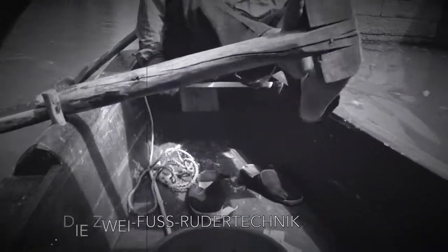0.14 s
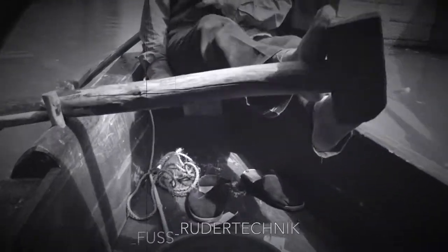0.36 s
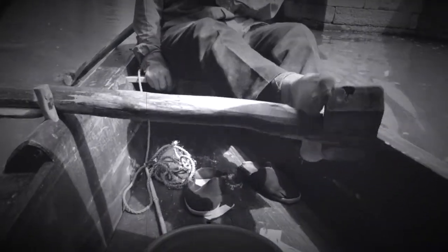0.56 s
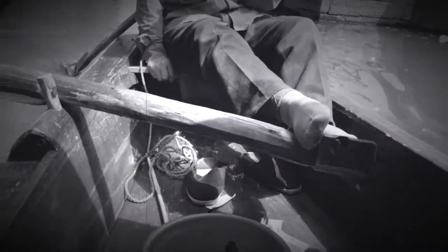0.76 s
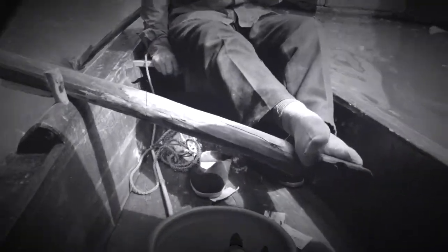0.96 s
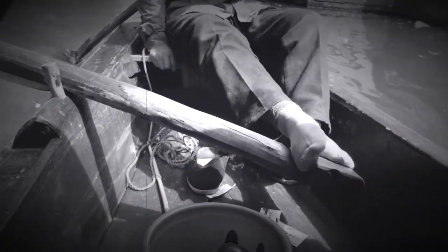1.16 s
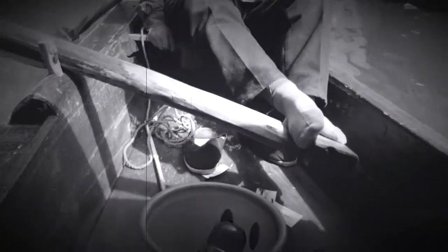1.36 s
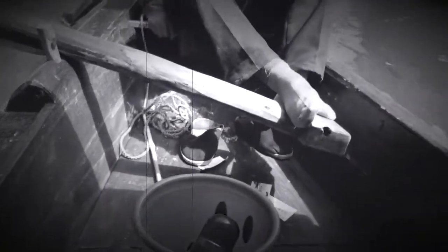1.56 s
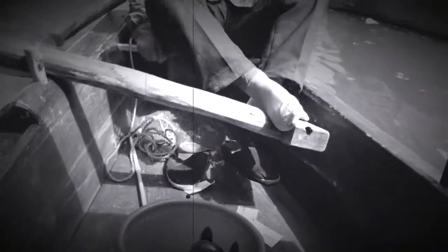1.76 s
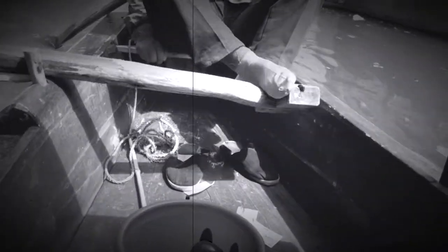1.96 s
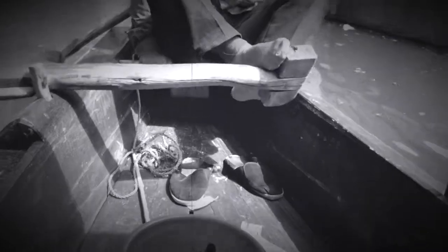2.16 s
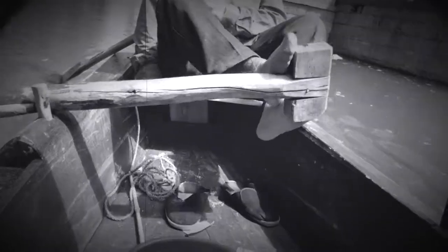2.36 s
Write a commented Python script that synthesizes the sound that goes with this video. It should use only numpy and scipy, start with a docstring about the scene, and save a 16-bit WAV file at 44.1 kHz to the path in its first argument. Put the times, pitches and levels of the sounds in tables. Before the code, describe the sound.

A wooden oar pivot squeals loudly, falling in pitch, then judders; later a dull wooden knock

```python
"""On a canal, a wooden oar worked by foot turns on its pivot in a small boat.
The pivot squeals by fast stick-slip on a falling pitch, then slow separate slips judder and ring the hull.
Later the oar knocks home: struck wood is a sum of dying tones with a puff of noise for the crack.
Clicks, ticks and scuffs sound over filtered noise for water, small rising chirps for bubbles, and a far hum.
The squeal overloads the recorder, which limits and softly clips it."""
import sys
import numpy as np
from scipy import signal
from scipy.fft import rfft, irfft
from scipy.io import wavfile
from scipy.ndimage import uniform_filter1d

SR = 44100
rng = np.random.default_rng(int(sys.argv[2]) if len(sys.argv) > 2 else 0)


def bounce(signal):
    """Save signal as a 16-bit WAV file at the path given by the first command-line argument."""
    frames = np.transpose(np.atleast_2d(signal))
    limited = np.clip(frames, -1, 1)
    pcm = np.round(limited * 32767).astype(np.int16)
    wavfile.write(sys.argv[1], SR, pcm)


N = 105840
T = np.arange(N) / SR  # time in seconds
SIDES = np.array([[1], [-1]])  # opposite signs for left and right
EDGE_HZ = 15750  # top of the recorded band

# How alike left and right are. Each row: frequency in Hz, likeness (1 = identical).
SAME = [(60, .98), (600, 0.95), (1400, 0.91), (3100, 0.61), (6800, 0.035), (15000, 0.024)]
# Tones of the oar and hull. Each row: frequency in Hz, relative level in dB, seconds to fall 60 dB.
HULL = [(128.5, -8.5, 0.19), (258.2, -0.5, 0.15), (296, -1.5, 0.25), (370.2, 9.5, .11), (439, 7, 0.096),
        (492.6, 0, 0.12), (555, 6.5, .09), (630.6, 11, 0.12), (708, -4.5, 0.1), (725, 3, 0.048),
        (833, 3.5, 0.12), (910, -4.5, 0.14), (1061.6, 6, 0.076), (1125, -7, .1)]
# How the water changes. Each row: time in seconds, then rumble, wash and hiss relative levels in dB.
WATER = [(0, -34.5, -35, -41), (.14, -37, -35.5, -56), (.45, -38, -38.5, -51), (.66, -44, -42.5, -50.5),
         (.82, -43, -43, -50.5), (1.05, -40, -42.5, -51.5), (1.2, -40, -41.5, -56), (1.4, -41.5, -42, -52),
         (1.56, -39.5, -46.5, -58), (1.74, -42, -44, -55), (1.92, -42.5, -43, -62), (2.1, -38, -44, -57.5),
         (2.27, -37, -44.5, -49), (2.4, -40, -39, -53)]


def amp(db):
    """Turns decibels into a gain."""
    return 10 ** (np.asarray(db) / 20)


def unit(x):
    """Scales a signal to an rms of 1."""
    return x / np.sqrt(np.mean(x ** 2) + 1e-20)


def read(points, hz):
    """Reads a table of frequencies and values, with pitch-like (log) spacing between points."""
    f, value = np.transpose(points)
    return np.interp(np.log(hz + 1), np.log(f + 1), value)


def curves(table):
    """Draws each column of a timed table as a curve, sample by sample."""
    s, *columns = np.transpose(table)
    return [np.interp(T, s, c) for c in columns]


def waver(hz):
    """Random motion with rms 1, mostly slower than the given rate."""
    smooth = 1 + (np.fft.rfftfreq(N, 1 / SR) / hz) ** 4
    return unit(irfft(rfft(rng.standard_normal(N)) / smooth, N))


def colour(x, spectrum):
    """Filters a sound by a table of frequencies and dB."""
    size = x.shape[-1]
    return irfft(rfft(x) * amp(read(spectrum, np.fft.rfftfreq(size, 1 / SR))), size)


def noise(spectrum, size=N):
    """Stereo noise: the two sides share most of their bass and little of their treble."""
    a, b = rfft(rng.standard_normal((2, size)))
    same = np.clip(read(SAME, np.fft.rfftfreq(size, 1 / SR)), -1, 1)
    right = same * a + np.sqrt(1 - same ** 2) * b
    return unit(colour(irfft(np.array([a, right]), size), spectrum))


def burst(spectrum, t60):
    """A dying puff of noise with a soft start, scaled to energy 1 on the left."""
    x = noise(spectrum, size=8192)
    t = T[:x.shape[1]]
    rise_s = 0.021 * t60
    x = x * amp(-60 * t / t60) * (1 - np.exp(-(t / rise_s) ** 2))
    return x / np.linalg.norm(x[0])


def ring(modes, rise_s):
    """Struck wood or hull: a sum of tones that each die at their own rate."""
    tones = sum(amp(db - 60 * T / t60) * np.sin(2 * np.pi * hz * T) for hz, db, t60 in modes)
    return (1 - np.exp(-T / rise_s)) * tones


def blows(rows):
    """Single-sample hits from rows of seconds and dB."""
    x = np.zeros(N)
    for s, db in rows:
        x[round(s * SR)] += amp(db)
    return x


def excite(force, response):
    """Lets a force set off a response, by convolution."""
    return signal.fftconvolve(np.atleast_2d(force), np.atleast_2d(response), axes=1)[:, :N]


def strokes(rows, ramp_s):
    """Level of each rub as it rises, holds and falls; rows give start, length in seconds and dB."""
    return sum(amp(db) * np.clip(np.minimum(T - s, s + length - T) / ramp_s, 0, 1)
               for s, length, db in rows)


def boat(x):
    """Dense short reflections inside the open hull, dying at a rate set by frequency."""
    # Each row: frequency in Hz, seconds to fall 60 dB.
    boat_t60 = [(100, 0.4), (500, 0.28), (1200, 0.21), (2500, 0.1), (5000, 0.16), (15000, 0.12)]
    hz, t, z = signal.stft(noise([(20, 0), (20000, 0)], size=16384), SR, nperseg=256)
    fade = amp(-60 * t / read(boat_t60, hz)[:, None])
    tail = signal.istft(z * fade, SR, nperseg=256)[1]
    return excite(x, tail / np.linalg.norm(tail[0]))


def water():
    """Low rumble, lapping wash and fine hiss from filtered noise, with a faint far hum."""
    # Colours of the three layers. Each row: frequency in Hz, relative level in dB.
    rumble_colour = [(20, -15), (45, -5.5), (70, 0), (105, 3.5), (145, 0.5), (175, -4.5), (225, -2.5),
                     (265, 4), (300, -17), (500, -43)]
    wash_colour = [(150, 0.5), (300, 4.5), (370, 5.5), (430, 5), (540, 4), (630, 1), (730, 5), (790, -3),
                   (870, 4.5), (1100, -2), (1400, -0.5), (1900, -13.5), (2600, -17), (5000, -81)]
    hiss_colour = [(900, -27), (1800, 14), (2600, 4), (3500, 1.5), (4500, -2.5), (7000, -9.5), (10000, -19),
                   (15500, -64)]
    rumble_db, wash_db, hiss_db = curves(WATER)
    rumble = amp(rumble_db) * noise(rumble_colour)
    wash = amp(wash_db + 2.16 * waver(hz=35)) * noise(wash_colour)
    hiss = amp(hiss_db + 2.1 * waver(hz=40) + 2.0 * waver(hz=500)) * noise(hiss_colour)
    hum_hz = 502.5 + 1.62 * waver(hz=6.3)
    hum_level = np.sqrt(2) * amp(-49.5 + 0.83 * waver(hz=2.4))
    hum = hum_level * np.sin(2 * np.pi * np.cumsum(hum_hz) / SR)
    return rumble + wash + hiss + hum


def laps():
    """Tiny bubbles and drips along the hull: short rising chirps, louder when the water hisses."""
    laps_per_s, lap_db, spread_db, lap_cycles = 150, -5, 2.5, 6.9
    low_hz, high_hz, pitches = 645.3, 3556, 24
    hiss_db = curves(WATER)[2]
    out, t = np.zeros((2, N)), T[:2048]
    for hz in np.geomspace(low_hz, high_hz, pitches):
        chance, size, pan = rng.random(N), rng.exponential(1, N), rng.uniform(-0.58, 1)
        level = amp(hiss_db + lap_db + spread_db * np.minimum(size, 3))
        drops = (chance < laps_per_s / pitches / SR) * level
        u = t * hz / lap_cycles
        swell = np.e * u * np.exp(-u)
        chirp = np.sin(2 * np.pi * hz * t * (1 + 2 * t))
        bubble = swell * chirp * (hz / high_hz) ** -.7  # deeper bubbles are louder
        out += excite(drops, bubble) * amp(2 * pan * SIDES)
    return out


def squeal():
    """Fast stick-slip: a strong fundamental, overtones shaped by the wood, and a rasp at each slip."""
    # Each row: time in seconds, slips per second, relative level in dB,
    # relative level of overtones and rasp in dB, roughness from 0 to 1.
    squeal_path = [(.134, 677, -28.5, -14, 0.72), (.142, 634.8, -13.5, 8.5, 0.71),
                   (.151, 556.5, -6.5, 2, 0.47), (.162, 527.5, -3, -2.5, 0.47),
                   (.18, 495.5, -4.5, -2, 0.05), (.204, 472.6, -6, -1.5, 0.13),
                   (.219, 443.3, -5.5, -4, 0.02), (.245, 437.1, 0, -2.5, 0.04), (.275, 429, -2, -3, 0),
                   (.291, 421.3, 3.5, -2.5, 0.1), (.299, 407, -7.5, 7.5, .6)]
    # The squeal stumbles. Each row: time in seconds, dip of the fundamental in dB.
    catches = [(0.172, 8.5), (.212, 2.5)]
    # Overtone levels set by the wood. Each row: frequency in Hz, relative level in dB.
    pivot = [(500, -7), (900, -12), (1100, -6.5), (1350, -19), (1750, -17), (2200, -15), (2600, -25.5),
             (3000, -22), (3500, -30.5), (3900, -30), (4600, -38.5), (6500, -42), (9000, -55),
             (15000, -60.5)]
    # Colour of the rasp. Each row: frequency in Hz, relative level in dB.
    rasp_colour = [(100, -37), (300, -9), (600, 0), (1050, 0.5), (1400, -18), (2250, -16.5), (3000, -26),
                   (5000, -46), (9000, -45.5), (15000, -58)]
    catch_s, catch_sag, catch_rough = 0.00272, 0.117, 0.24  # sag is a share of the pitch
    jitter, release_s = 0.091, 0.0028  # jitter is a share of the pitch at full roughness
    # A resonance of the pivot flares as the squeal starts.
    shriek_hz, shriek_width_hz = 2285, 240
    shriek_db, shriek_end_s, shriek_fade_s = 10.5, 0.165, 0.0038
    wander_db, treble_rough = 2.5, 0.035  # roughness in radians per overtone number

    hz, db, over_db, rough = curves(squeal_path)
    bumps = [np.exp(-((T - s) / catch_s) ** 2) for s, _ in catches]
    dip_db = sum(b * dip for b, (_, dip) in zip(bumps, catches))
    rough = np.clip(rough + catch_rough * sum(bumps), 0, 1)
    hz = hz * (1 - catch_sag * sum(bumps)) * (1 + jitter * rough * waver(hz=220))
    turns = np.cumsum(hz) / SR  # slips so far

    start = np.clip((T - squeal_path[0][0]) / release_s, 0, 1)
    end = np.exp(-np.maximum(T - squeal_path[-1][0], 0) / release_s)
    level = amp(db) * start * end
    flare_db = shriek_db * .5 * (1 - np.tanh((T - shriek_end_s) / shriek_fade_s))
    wander, shake = waver(hz=36), waver(hz=300)

    on, over = level > 1e-4, np.zeros((2, N))
    for k in np.arange(2, 36):
        f, shift = k * hz[on], rng.integers(N)  # each overtone wanders on its own
        likeness = np.clip(read(SAME, f.mean()), -1, 1)
        spread = np.arccos(likeness) / 2 * rng.choice([-1, 1]) * SIDES
        near_shriek = np.exp(-((f - shriek_hz) / shriek_width_hz) ** 2)
        k_db = read(pivot, f) + wander_db * np.roll(wander, shift)[on] + flare_db[on] * near_shriek
        angle = 2 * np.pi * (k * turns[on] + rng.random())
        angle = angle + treble_rough * k * np.roll(shake, shift)[on]
        over[:, on] += amp(k_db) * (f < EDGE_HZ) * np.sin(angle + spread)

    slip_pulse = unit(0.95 + np.exp(-(turns % 1) / 1.1))
    rasp = amp(-8) * rough * noise(rasp_colour) * slip_pulse
    upper = level * amp(over_db) * (np.sqrt(2) * over + rasp)
    base = np.sqrt(2) * level * amp(-dip_db) * np.sin(2 * np.pi * turns)
    return base + upper + amp(-6.5) * boat(upper + amp(-12) * base)


def judder():
    """The oar slows: separate slips strike the wood and ring the hull."""
    # Each row: time in seconds, slips per second, relative level in dB, relative crackle level in dB.
    judder_path = [(.292, 125.3, 8, -1), (.302, 126, 0, -2), (.312, 125, 3, 7.5), (.322, 122.7, 6, 5.5),
                   (.331, 125, -27, -16.5), (.339, 122, -2, -30)]
    # Colours of the grit and crackle. Each row: frequency in Hz, relative level in dB.
    grit_colour = [(100, -16), (170, -14.5), (300, -3.5), (700, 5), (1000, -3.5), (1400, -7), (1850, -10),
                   (2300, -7.5), (3000, -36), (5000, -57)]
    crackle_colour = [(500, -26), (2000, 8.5), (3000, -1), (4000, -5.5), (5500, -13.5), (8000, -20),
                      (15000, -29)]
    hz, db, crackle_db = curves(judder_path)
    on = (T >= judder_path[0][0]) & (T <= judder_path[-1][0])
    turns = np.cumsum(on * hz * (1 + .09 * waver(hz=91.3))) / SR
    # One hit each time the count of slips passes a whole number.
    slips = np.diff(np.ceil(turns), prepend=0) * amp(db + 2 * waver(hz=151))
    wood = amp(-13) * excite(slips, ring(HULL, rise_s=0.0028))
    grit = amp(23.5) * excite(slips, burst(grit_colour, t60=0.085))
    crackle = amp(4.5) * excite(slips * amp(crackle_db), burst(crackle_colour, t60=.045))
    return wood + grit + crackle + amp(-14) * boat(wood + crackle)


def clicks():
    """Small ticks of shifting wood, and dry snaps to the left made of short tones and a noise puff."""
    # Small ticks. Each row: time in seconds, relative level in dB.
    tick_times = [(.422, -29.5), (.572, -25.5), (.761, -26), (.9783, -15), (.9815, -28), (.989, -27),
                  (1.434, -27), (1.607, -34.5), (2.112, -28), (2.25, -24.5), (2.31, -32)]
    # Colour of a tick. Each row: frequency in Hz, relative level in dB.
    tick_colour = [(300, 15), (1200, -4), (3500, 10.5), (6000, -0.5), (9000, -12.5), (15000, -12)]
    # Dry wooden snaps. Each row: time in seconds, relative level in dB, treble tilt in dB per kHz.
    snap_times = [(1.1826, -20, 1.5), (1.295, -27, -1.14)]
    # Tones of a snap. Each row: frequency in Hz, relative level in dB, seconds to fall 60 dB.
    snap_tones = [(1150, -9, 0.022), (1650, -0.5, 0.014), (1860, 1, 0.0072), (2760, 2, 0.016),
                  (3610, -8, 0.013), (5630, -12.5, 0.013), (7300, -2, 0.0063)]
    # Colour of the body of a snap. Each row: frequency in Hz, relative level in dB.
    snap_colour = [(600, -1), (1200, -10), (1700, 6), (2800, 7), (3900, -15), (4600, -8), (6000, -14),
                   (7500, -21), (9000, -14), (14000, -37)]
    pan_db, lead_s = 3, .00006  # the snap is louder on the left and gets there first

    ticks = excite(blows(tick_times), amp(4.5) * burst(tick_colour, t60=0.032))
    snap = np.zeros(N)
    for s, db, tilt in snap_times:
        tilted = [(f, d + tilt * f / 1000, t60) for f, d, t60 in snap_tones]
        snap += excite(blows([(s, db)]), ring(tilted, rise_s=0.00023))[0]
    delay = np.exp(-2j * np.pi * np.fft.rfftfreq(N, 1 / SR) * lead_s)
    late = irfft(rfft(snap) * delay, N)
    snap = np.array([snap, late]) * amp(pan_db * SIDES)
    snap_hits = blows([(s, db) for s, db, _ in snap_times])
    crack = excite(snap_hits, amp(9.5) * burst(snap_colour, t60=0.01))
    return snap + crack + ticks


def scuffs():
    """Grainy scuffs and slides of noise along the oar, and short dry rubs of the pivot."""
    # Thin, grainy swishes of wood sliding on wood, foot and cloth rubbing on wood, and rubs of the pivot.
    # Each row: start in seconds, length in seconds, relative level in dB.
    swish_times = [(0.581, 0.11, -52), (2.154, 0.076, -44.5)]
    scuff_times = [(0.617, 0.11, -48), (1.03, .1, -50.5), (1.428, 0.079, -44), (2.118, .11, -41.5),
                   (2.243, 0.15, -52.5)]
    rub_times = [(2.247, 0.033, -38), (2.38, .05, -33)]
    # Their colours. Each row: frequency in Hz, relative level in dB.
    swish_colour = [(1500, -13), (2700, 3), (3250, 8), (3750, 8), (4300, -24), (7500, -33), (11000, -30),
                    (14000, -17)]
    scuff_colour = [(300, -11), (1000, 12), (2300, 2), (3500, -0.5), (4700, -5), (7500, -11), (10500, -20),
                    (13500, -20), (16000, -20)]
    rub_colour = [(500, -12), (850, -3), (1000, -3), (1150, -8), (1400, 8), (1800, 7), (2200, -7),
                  (5000, -36)]
    scuffing = strokes(scuff_times, ramp_s=0.015) * noise(scuff_colour)
    swishing = strokes(swish_times, ramp_s=0.017) * noise(swish_colour)
    grain = amp(1.3 * waver(hz=250))
    rubbing = strokes(rub_times, ramp_s=0.011) * noise(rub_colour)
    return (scuffing + swishing) * grain + rubbing


def knocks():
    """Boards shift, the oar hits its pin and chatters, and the hull booms as it takes the load."""
    # The boat's boards shift. Each row: time in seconds, relative level in dB.
    bump_times = [(.981, -37.5), (.988, -39), (2.25, -46.5)]
    # The hull takes the load. Each row: time in seconds, relative level in dB.
    boom_times = [(.983, -31.5), (1.997, -18), (2.0235, -15.5)]
    # The oar hits its pin. Each row: time in seconds, relative ring level in dB, relative crack level in dB.
    knock_times = [(1.9913, -28, -12), (1.9975, -15.5, -25)]
    # Tones of the hull boom and the oar.
    # Each row: frequency in Hz, relative level in dB, seconds to fall 60 dB.
    boom_tones = [(46.4, -18.5, 0.86), (81, -6, 0.25), (96.3, 1, .2), (112, -2.5, 0.16),
                  (146.3, -7.5, 0.29), (186, -11, 0.21), (264, -13, 0.2)]
    oar_tones = [(456, -14.5, .12), (552, -8, 0.13), (730, 3, 0.075), (792, 3.5, 0.048), (849, 0.5, 0.11),
                 (933, -11, 0.065), (1042, -9, 0.13), (1130, -9, 0.044), (1260, -10, 0.072),
                 (1553, -3, 0.036), (2210, -5, 0.017), (2740, -28, 0.051)]
    # Colours of the crack and of a thin snap after it. Each row: frequency in Hz, relative level in dB.
    crack_colour = [(200, -5.5), (750, 10.5), (1600, -2.5), (2400, -4.5), (3100, -21), (4500, -26),
                    (7000, -44), (15000, -42)]
    splinter_colour = [(1500, -19), (3000, -2), (4200, 7), (5200, -6.5), (7000, -11), (11000, -21),
                       (15000, -23)]

    wood = excite(blows([(s, db) for s, db, _ in knock_times]), ring(oar_tones, rise_s=.001))
    crack_hits = blows([(s, db) for s, _, db in knock_times])
    crack = excite(crack_hits, amp(16.5) * burst(crack_colour, t60=0.083))
    splinter = excite(blows([(2.003, -19.5)]), amp(5) * burst(splinter_colour, t60=0.03))
    boom = excite(blows(boom_times), ring(boom_tones, rise_s=0.0038))
    boards = excite(blows(bump_times), ring(HULL, rise_s=0.0017))
    return wood + crack + splinter + amp(-13.5) * boat(wood + crack) + boom + boards


def scene():
    """All sources at the microphone pair, with the left-right balance set by frequency."""
    # Each row: frequency in Hz, left minus right in dB.
    left_db = [(60, -2.5), (150, -2), (400, -1.1), (1200, -1.5), (2400, 0.2), (5000, -1.5), (9000, 0.5),
               (14000, 4.5)]
    left, right = water() + laps() + squeal() + judder() + clicks() + scuffs() + knocks()
    left = colour(left, [(f, db / 2) for f, db in left_db])
    right = colour(right, [(f, -db / 2) for f, db in left_db])
    return np.array([left, right])


def record(dry):
    """A fast limiter and a soft overload hold the squeal; then a low-pass filter ends the band."""
    limit, recovery_db_per_s, knee = 1.5, 200, 3  # a higher knee clips more sharply
    over_db = np.maximum(20 * np.log10(abs(dry).max(0) / limit + 1e-9), 0)
    # The gain drops at once with each peak and recovers at a steady rate, then is smoothed.
    fall = T * recovery_db_per_s
    gain = amp(fall - np.maximum.accumulate(over_db + fall))
    held = dry * uniform_filter1d(gain, size=90)
    clipped = held / (1 + abs(held) ** (2 * knee)) ** (1 / (2 * knee))
    low_pass = signal.firwin(511, EDGE_HZ, window=("kaiser", 9), fs=SR)
    return signal.oaconvolve(clipped, low_pass[None], "same")


dry = scene()
out = record(dry)
bounce(out)
```